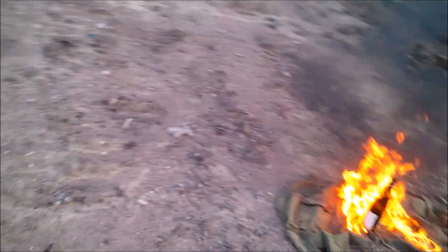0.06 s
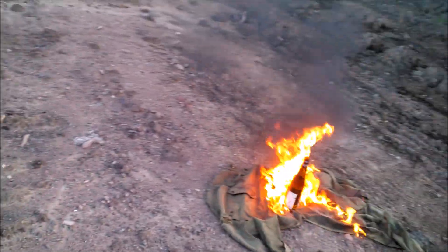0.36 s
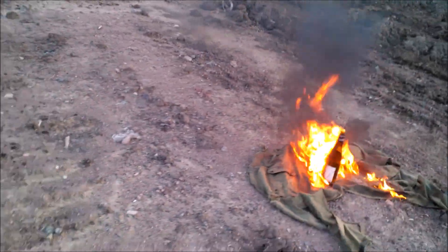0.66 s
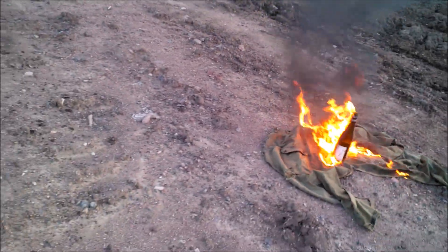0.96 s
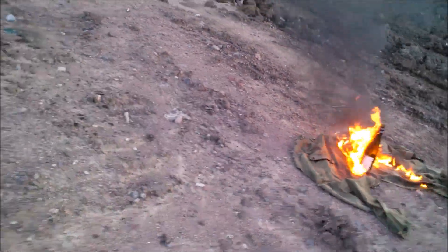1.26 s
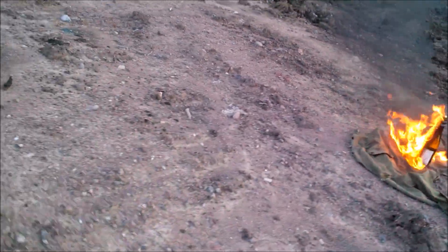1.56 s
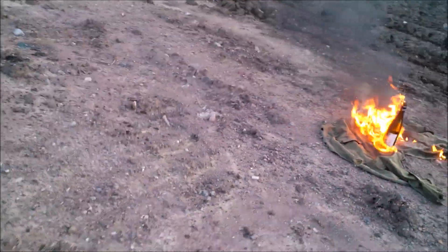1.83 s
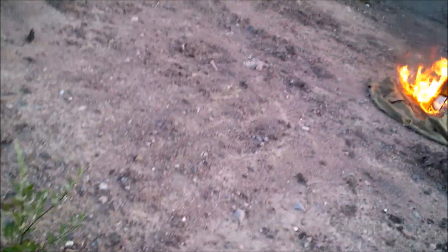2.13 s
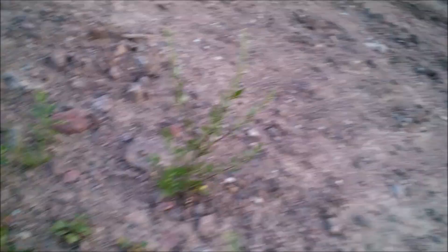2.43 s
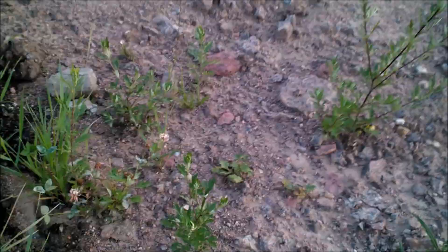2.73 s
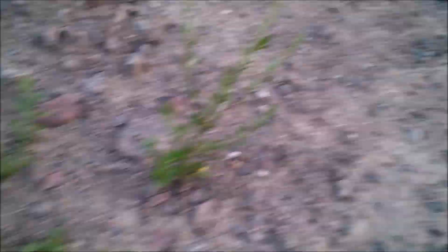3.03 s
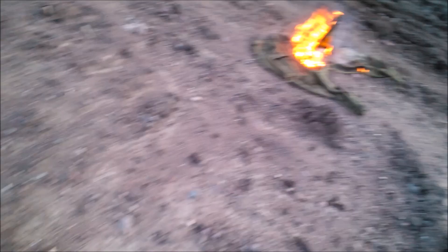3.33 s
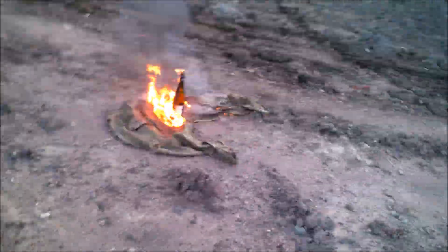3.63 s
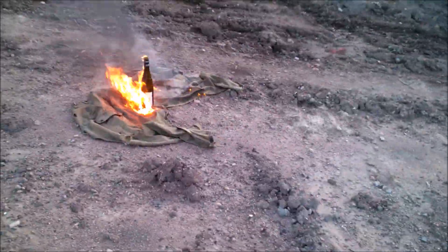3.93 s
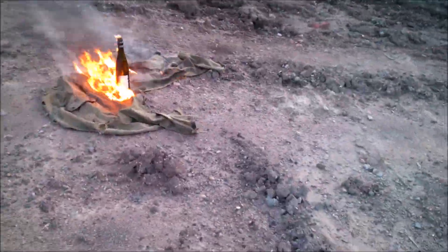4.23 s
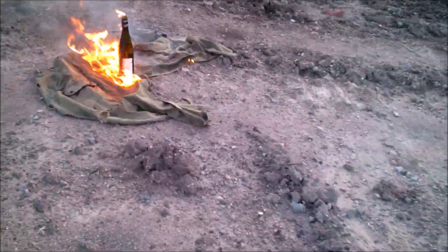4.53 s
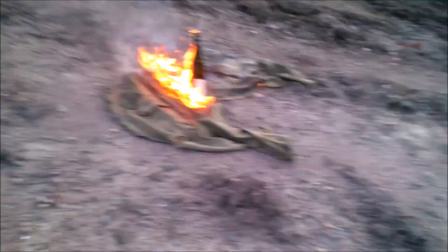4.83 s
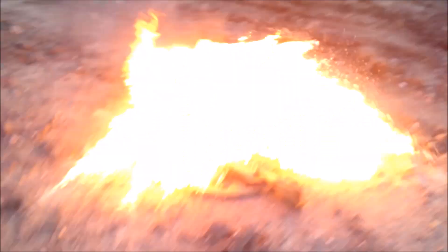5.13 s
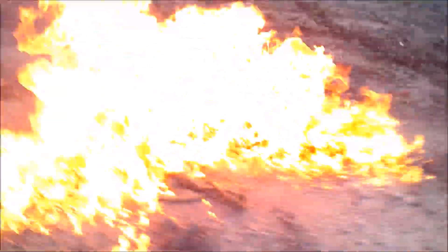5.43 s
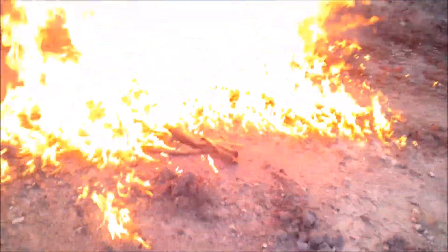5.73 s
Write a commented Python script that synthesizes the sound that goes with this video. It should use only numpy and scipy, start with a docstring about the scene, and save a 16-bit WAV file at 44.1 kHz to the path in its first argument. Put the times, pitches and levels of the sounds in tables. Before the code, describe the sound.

Wind buffets the microphone over gravel footsteps and a faintly crackling fire, until a glass bottle bursts and its fuel whooshes into a fireball.

```python
"""A bottle of fuel stands in a burning rag on open, stony ground. Wind buffets the microphone,
shoes scuff the gravel and the small fire crackles. Then the glass bursts, the fuel sprays out
and goes up in a fireball that thumps, whooshes and sinks to a sizzling blaze."""
import sys
import numpy as np
from scipy import signal
from scipy.fft import rfft, irfft, next_fast_len
from scipy.io import wavfile
from scipy.ndimage import uniform_filter1d

SR = 44100
rng = np.random.default_rng(int(sys.argv[2]) if len(sys.argv) > 2 else 0)


def master_out(mix):
    """Clip the mix to full scale and print it as 16-bit PCM to the path in sys.argv[1]."""
    frames = np.transpose(np.atleast_2d(mix))
    ceiling = np.clip(frames, -1, 1)
    pcm = np.round(ceiling * 32767).astype(np.int16)
    wavfile.write(sys.argv[1], SR, pcm)


N = 263277

# single eddies that hit the port: (s, peak dB, half width ms)
BUFFETS = [(.407, -14, 1.6), (.540, -8.5, 0.61), (.601, -16, 1.16), (.912, -8.5, 1.32), (1.172, -15.5, 1.13), (3.507, -18.5, 1.2)]
# soles sliding on gravel: (start s, length s, level dB, rasp Hz)
SCUFFS = [(0, 0.068, -40.5, 1330), (0.077, 0.11, -48.5, 1390), (0.503, 0.039, -49, 1080), (0.594, 0.1, -43, 1190), (1.047, 0.077, -46.5, 845), (1.475, 0.062, -50, 1020), (1.661, 0.067, -48, 930),
          (2.103, .07, -48.5, 970), (2.185, .11, -45.5, 1400), (2.545, 0.097, -50, 1200), (3.308, 0.11, -50, 1670), (3.47, 0.073, -44.5, 1400), (3.532, 0.11, -49, 1210),
          (4.185, 0.095, -47.5, 1300), (4.752, 0.036, -38.5, 1300), (4.779, 0.063, -48.5, 1900), (4.891, .1, -32, 1200), (5.002, 0.14, -50, 1260)]
# the larger stones knocking underfoot: (s, peak dB, pitch Hz, width octaves)
STONES = [(.030, -27.5, 1230, 0.44), (.0435, -25, 1050, 0.85), (.546, -35, 860, 1.9), (.802, -37.5, 1140, .9), (1.131, -31.5, 1360, 2.6), (1.579, -38.5, 990, 2.3), (2.172, -34, 960, 1.6),
          (2.565, -35, 1110, 2), (2.623, -31.5, 1560, 1.6), (3.491, -30, 1170, 1.7), (3.514, -29, 1100, 0.76), (3.557, -28.5, 1260, 1.9), (3.575, -28.5, 840, 1.3), (4.137, -32.5, 900, 1.8),
          (4.2164, -32.5, 1110, 1), (4.278, -37.5, 820, 0.47), (4.449, -36.5, 1970, 2.3), (4.624, -39, 1480, 0.84), (4.772, -23.5, 1276, 0.71), (4.8595, -36.5, 1880, 1.2),
          (4.906, -23, 1380, 1.2), (4.921, -24.5, 1190, 1.3), (4.939, -23.5, 1030, 1), (4.991, -27, 1680, 1.5)]
# sharp snaps of the fire: (s, peak dB, pitch Hz, width octaves)
SNAPS = [(.0435, -28.5, 4000, 0.66), (.304, -37, 3920, 1.2), (1.327, -27, 8400, 0.48), (2.088, -37, 5840, 0.74), (3.5745, -30.5, 4600, 0.74), (3.6088, -36, 4900, 1.2), (3.7503, -28.5, 2640, 1.3),
         (3.9984, -21.5, 7140, 0.57), (4.0568, -28, 7200, 0.39), (4.0569, -32, 3160, 0.48), (4.2304, -30.5, 4000, 1.7), (5.042, -29.5, 4000, 1.4), (5.392, -18, 6600, .9),
         (5.5427, -19.5, 3630, 0.62), (5.6485, -27, 8200, 0.79), (5.683, -26, 5430, 2.1), (5.692, -30.5, 2500, 1.7)]
# the bottle gives way and its pieces collide: (s, crack dB, ring dB, crack t60 s, brightness Hz)
BREAKS = [(5.1452, -1.5, -16, 0.038, 14100), (5.1472, -13, -15, 0.041, 11100), (5.1605, 1, -14, 0.024, 1690), (5.1728, -16, -31, 0.014, 10000), (5.2012, -27, -40, 0.1, 9100)]
# modes of the glass: (Hz, dB, t60 s)
GLASS = [(1650, -9, 0.35), (1740, -6, 0.092), (1805, 7.5, 0.04), (2440, 4.5, 0.092), (2970, -7, 0.037), (3410, 4, 0.067), (3540, -4, 0.13), (4510, -3.5, 0.15), (4900, -4, 0.05),
         (4670, -10, 0.11), (5400, -8, 0.071), (6390, -2, 0.098), (6860, 7, 0.033), (8180, -9, 0.064), (10800, -1, 0.049), (11300, -2, 0.065)]
# spectra: (Hz, dB per Hz)
AIR = [(120, 5), (200, 4.5), (300, 0.5), (640, -3.5), (1300, -5.5), (2400, -11), (4000, -12), (8200, -22), (11000, -24), (15500, -23)]
AIR_DB = -55
GUST = [(10, -1), (22, 4.5), (45, -1.5), (90, -12), (150, -24), (250, -35), (500, -53), (6000, -125)]
EDDY = [(50, 13), (120, 6.5), (220, 0), (400, -28.5), (900, -27), (8000, -125)]
GRAVEL = [(200, -6.5), (600, 4), (1000, 3.5), (1550, -0.5), (2200, -6), (3000, -1.5), (4000, -12.5), (7500, -15.5), (9000, -25.5), (15000, -39)]
CRACK = [(150, -29), (500, -15), (1200, -8), (1750, 3), (2150, -12.5), (2600, 4.5), (4000, -3.5), (5000, 7), (5900, -6), (8300, -3), (9500, -11), (15500, -11.5)]
SURGE = [(10, -2), (22, 8), (45, 3.5), (65, 1.5), (80, -8.5), (100, -2.5), (130, -8.5), (180, -11.5), (240, -18), (400, -30.5), (1200, -60)]
ROAR = [(60, -16), (170, 4), (260, -0.5), (400, -3), (650, -5), (800, -8), (1100, -11), (1550, -13), (2300, -32), (5000, -43), (12000, -57)]
SIZZLE = [(500, -18), (1500, -2.5), (3000, -1.5), (4500, 4.5), (6100, -4.5), (7500, -1.5), (9000, -7.5), (11000, -5.5), (12500, -14), (15500, -21)]
WHOOSH = [(150, 7), (400, -3.5), (900, 3.5), (1600, 1.5), (2100, -6), (2900, 0), (4000, -8.5), (6500, -18), (10000, -39), (15500, -30)]
TOP_HZ = 16000  # fixed
TIME = np.arange(N) / SR
# hiss of the burning rag, with a louder hiss in the first moments as the first sole scrapes: (s, level dB)
HISS = [(0.0, -49), (0.18, -59), (0.95, -61.5), (1.63, -58), (3.3, -60.5), (4.75, -59.5)]
FLAME_HISS = [(1200, -9), (2400, -5), (3500, -2.5), (4700, -2), (6200, -8), (7200, -13.5), (8400, -30), (15500, -34)]
# the breeze on the microphone between gusts: (s, level dB)
BREEZE = [(0.1, -34.5), (0.3, -30.5), (0.45, -23.5), (0.95, -30), (1.5, -26), (1.65, -36), (2.2, -42.5), (2.55, -37), (2.85, -48), (3.45, -29), (3.95, -50), (4.75, -50.5), (5.1, -36.5)]
# gusts, each swelling and dying alike: (s, level dB)
GUSTS = [(0.0, -23.5), (.405, -21.5), (0.556, -14), (0.718, -17.5), (1.11, -22.5), (1.2, -23.5), (1.424, -19), (2.0, -31.5), (3.12, -40), (3.505, -38)]
GUST_SWELL_S = 0.042
STONE_CYCLES, SNAP_CYCLES = 19, 29  # cycles until a knock or a snap has died by 60 dB
LIT_S = 5.145  # the spray catches fire
FRONT_PEAK_S, FRONT_DB = 5.374, -19  # the flame front reaches the edge of the spray
FRONT_GROW_DB_PER_S, FRONT_DIE_DB_PER_S = 178, 1100
WHOOMP_S, WHOOMP_START_HZ, WHOOMP_END_HZ, WHOOMP_GROW_S = 5.166, 204.9, 87.97, 0.056  # the puff of ignition deepens as the ball of gas grows
FLARE_S = 4.89  # the flame flares up around the bottle
SING_HZ, SING_RISE_OCTAVES_PER_S, SING_WIDTH_HZ, SING_DB = 502, 3.0, 70, -33  # the hollow tone of the rising flame


def undb(db):
    """Decibels to gain."""
    return 10 ** (np.asarray(db) / 20)


def curves(table):
    """Each column of a table, joined by straight lines in time."""
    s, *columns = np.transpose(table)
    return [np.interp(TIME, s, c) for c in columns]


def colour(x, spectrum):
    """Shape a signal by (Hz, dB) points; rms 1."""
    hz, db = np.transpose(spectrum)
    size = next_fast_len(len(x))
    f = np.maximum(np.arange(size // 2 + 1) * SR / size, 1)
    y = irfft(rfft(x, size) * undb(np.interp(np.log(f), np.log(hz), db)), size)[:len(x)]
    return y / np.std(y)


def noise(spectrum):
    """Coloured noise of rms 1."""
    return colour(rng.standard_normal(N), spectrum)


def even(x, span_s):
    """Hold a rumble at rms 1 over spans of span_s."""
    size = int(span_s * SR) + 1
    return x / np.sqrt(uniform_filter1d(uniform_filter1d(x ** 2, size), size) + 1e-9)


def walk(rate):
    """A smooth random wander of spread near 1."""
    return 1.2 * np.interp(TIME * rate, np.arange(4096), rng.standard_normal(4096))  # fixed


def grains(rate, spread_db):
    """Random tiny impulses, many weak and a few strong; rms 1."""
    size = undb(spread_db * np.minimum(rng.exponential(size=N), 4))  # fixed
    x = (rng.random(N) < rate / SR) * size * rng.choice([-1, 1], N)
    return x / np.std(x)


def fade(t, t60):
    """Exponential decay, 60 dB down after t60."""
    return np.exp(-np.log(1000) * t / t60)


def add(out, s, x):
    """Mix a short sound in at time s."""
    i = max(int(s * SR), 0)
    out[i:i + len(x)] += x[:N - i]


def clicks(table, cycles, edge_db):
    """Brief fractures: a burst of noise rings a broad resonance over a weaker wide-band edge; higher ones die sooner."""
    out, t = np.zeros(N), TIME[:2048]
    for (s, db, hz, octaves), chance in zip(table, rng.standard_normal((len(table), len(t)))):
        burst = chance * fade(t, cycles / hz)
        edges = [hz / 2 ** (octaves / 2), min(hz * 2 ** (octaves / 2), SR / 2 - 1000)]
        body = signal.sosfilt(signal.butter(2, edges, "band", fs=SR, output="sos"), burst)
        y = body + undb(edge_db) * signal.sosfilt(signal.butter(1, 5000, fs=SR, output="sos"), burst)
        add(out, s, undb(db) * y / np.abs(y).max())
    return out


def wind(eddy_db=-17, eddy_growth=1.8, strong_db=-25):
    """Turbulence at the port: stronger gusts shed smaller eddies, and a few land as blunt pressure bumps."""
    breeze_db, = curves(BREEZE)
    gusts = sum(undb(db) * np.exp(-((TIME - s) / GUST_SWELL_S) ** 2) for s, db in GUSTS)
    force = np.hypot(undb(breeze_db), gusts)
    out = force * even(noise(GUST), span_s=0.15)
    out += undb(strong_db + eddy_db + 5.4 * walk(35)) * (force / undb(strong_db)) ** eddy_growth * noise(EDDY)
    for s, peak_db, half_ms in BUFFETS:
        u = (TIME - s) * 1000 / half_ms  # fixed
        out += undb(peak_db) / (1 + u ** 2)
    return out


def air(waver_db=.5):
    """The soft, even rush of the open country."""
    return undb(AIR_DB + waver_db * walk(40)) * noise(AIR)


def footsteps(rasp_q=2.2, rasp_share=0.81):
    """Each sole grinds a run of grit in fits and starts, with its own rasp; larger stones knock on their own."""
    out = np.zeros(N)
    slips = undb(3.5 * walk(170))  # fixed
    grit = colour(grains(rate=800, spread_db=2.0), GRAVEL) * slips
    for s, length, db, hz in SCUFFS:
        start = max(int(s * SR), 0)
        run = grit[start:start + int(length * SR)]
        run = run + rasp_share * signal.lfilter(*signal.iirpeak(hz, rasp_q, fs=SR), run)
        press = np.sin(np.linspace(0, np.pi, len(run)))
        add(out, s, undb(db) * press * run / np.std(run))
    return out + clicks(STONES, STONE_CYCLES, edge_db=-33.0)


def small_fire(tick_db=-68, flare_db=-48.0):
    """The burning rag hisses, ticks faintly, snaps now and then and finally flares."""
    hiss_db, = curves(HISS)
    hiss = undb(hiss_db + 1.8 * walk(5.03)) * noise(FLAME_HISS)
    flaring = envelope(FLARE_S, attack_s=0.059, hold_s=0.054, fall_db_per_s=44)
    flare = undb(flare_db) * flaring * colour(grains(rate=2600, spread_db=4.0), SIZZLE)
    sparks = grains(rate=90, spread_db=4)  # fixed
    ticks = undb(tick_db) * colour(sparks, SIZZLE)
    return hiss + flare + ticks + clicks(SNAPS, SNAP_CYCLES, edge_db=-9.5)


def bottle(detune=0.0088):
    """Every break is a crack of noise plus the short ring of the glass; each piece is tuned a little differently."""
    out, t = np.zeros(N), TIME[:12000]
    hz, mode_db, t60 = np.transpose(GLASS)[:, :, None]
    cracks = noise(CRACK)
    for k, (s, crack_db, ring_db, crack_t60, bright_hz) in enumerate(BREAKS):
        tuning = 1 + detune * rng.standard_normal(hz.shape)
        sign = rng.choice([-1, 1], hz.shape)
        ring = np.sum(sign * undb(mode_db) * fade(t, t60) * np.sin(2 * np.pi * hz * tuning * t), axis=0) / 2
        blow = undb(crack_db) * fade(t, crack_t60) * cracks[k * len(t):(k + 1) * len(t)] + undb(ring_db) * ring
        add(out, s, signal.sosfilt(signal.butter(1, min(bright_hz, SR / 2 - 1000), fs=SR, output="sos"), blow))
    return out


def fireball(flutter_db=2.0, droplet_share=0.87, spray_db=-25):
    """Expanding gas shoves the air, turbulent flame roars and flutters, and droplets of fuel spray out and sizzle."""
    flutter = flutter_db * walk(90)
    surge = burn(peak_db=-8.5, attack_s=0.036, hold_s=0.026, fall_db_per_s=49.5, blaze_db=-33.5) * even(noise(SURGE), span_s=0.022)
    roar = burn(peak_db=-25.0, attack_s=0.016, hold_s=0.14, fall_db_per_s=42.5, blaze_db=-49.5)
    roar = roar * undb(flutter) * even(off_the_ground(noise(ROAR), LIT_S), span_s=0.041)
    spray = undb(spray_db) * envelope(LIT_S, attack_s=0.0039, hold_s=0.0039, fall_db_per_s=450)
    sizzle = spray + burn(peak_db=-36.5, attack_s=0.044, hold_s=0.27, fall_db_per_s=58, blaze_db=-53)
    droplets = droplet_share * grains(rate=1700, spread_db=2.5) + rng.standard_normal(N)
    return surge + roar + flame_front(flutter) + sizzle * undb(walk(45)) * colour(droplets, SIZZLE)


def off_the_ground(x, lit_s, lag_ms=5.29, shrink=0.23, bounce=0.1):
    """Flame noise arrives directly and off the ground; the lag shrinks as the fire spreads, so the hollow tone rises."""
    lag = lag_ms / 1000 * np.exp(-shrink * np.maximum(TIME - lit_s, 0))
    return (x + bounce * np.interp(TIME - lag, TIME, x)) / np.sqrt(1 + bounce ** 2)


def whoomp(level_db=-16.0):
    """The igniting cloud pulses unevenly, like a big soft drum."""
    small = np.exp(-((TIME - WHOOMP_S) / WHOOMP_GROW_S) ** 2)
    hz = WHOOMP_END_HZ + (WHOOMP_START_HZ - WHOOMP_END_HZ) * small
    waver = 1 + .09 * walk(80)  # fixed
    phase = 2 * np.pi * np.cumsum(hz * waver) / SR
    puff = envelope(WHOOMP_S, attack_s=0.0094, hold_s=0.095, fall_db_per_s=270)
    return puff * undb(level_db + 0.87 * walk(67)) * np.sqrt(2) * np.sin(phase)


def envelope(start_s, attack_s, hold_s, fall_db_per_s):
    """Gain that rises to 1, holds and then falls evenly in dB."""
    t = TIME - start_s
    return np.clip(t / attack_s, 0, 1) * undb(-fall_db_per_s * np.maximum(t - attack_s - hold_s, 0))


def burn(peak_db, attack_s, hold_s, fall_db_per_s, blaze_db):
    """Gain of one voice of the fireball: it flashes up, holds while the spray burns and sinks to the steady blaze."""
    flash = undb(peak_db) * envelope(LIT_S, attack_s, hold_s, fall_db_per_s)
    return np.hypot(flash, undb(blaze_db)) * (TIME > LIT_S)


def flame_front(flutter):
    """The front races through the spray, ever louder, and dies at once when it runs out of fuel; a hollow tone climbs with it."""
    t = TIME - FRONT_PEAK_S
    db = FRONT_DB + np.minimum(FRONT_GROW_DB_PER_S * t, -FRONT_DIE_DB_PER_S * t)
    rush = undb(db + flutter / 2) * colour(grains(rate=13000, spread_db=5.0), WHOOSH)
    hz = SING_HZ * 2 ** (SING_RISE_OCTAVES_PER_S * (TIME - LIT_S))
    band = np.real((walk(SING_WIDTH_HZ) + 1j * walk(SING_WIDTH_HZ)) * np.exp(2j * np.pi * np.cumsum(hz) / SR))
    tone = undb(SING_DB) * envelope(LIT_S, attack_s=0.076, hold_s=0.14, fall_db_per_s=300) * band
    return (TIME > LIT_S) * rush + tone


def shards(count=14, first_s=5.18, spread_s=0.11, level_db=-29, fall_db_per_s=35, low_hz=3500, octaves=1.7, t60=0.025):
    """Splinters of glass land among the stones, each with a short, high tink; late ones are weaker."""
    out, t = np.zeros(N), TIME[:4096]
    for when, pitch, size in rng.random((count, 3)):
        late = -spread_s * np.log(1 - when)
        tink = fade(t, t60) * np.sin(2 * np.pi * low_hz * 2 ** (octaves * pitch) * t)
        add(out, first_s + late, undb(level_db - fall_db_per_s * late) * (.5 + size) * tink)
    return out


def scene():
    """Everything in the open, heard at one microphone."""
    return (air() + wind() + footsteps() + small_fire() + bottle() + shards() + fireball() + whoomp())[None]


def record(dry):
    """The recorder blocks slow pressure drift, clips on the burst and cuts the top."""
    x = signal.sosfilt(signal.butter(1, 10, "high", fs=SR, output="sos"), dry)  # fixed
    return signal.sosfilt(signal.ellip(12, .2, 90, TOP_HZ, fs=SR, output="sos"), np.clip(x, -1, 1))  # fixed


dry = scene()
out = record(dry)
master_out(out)
```